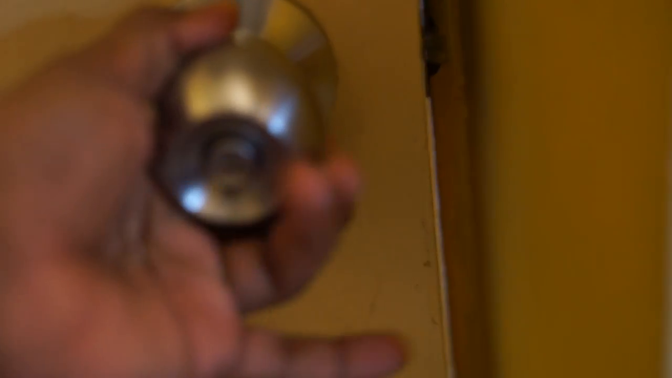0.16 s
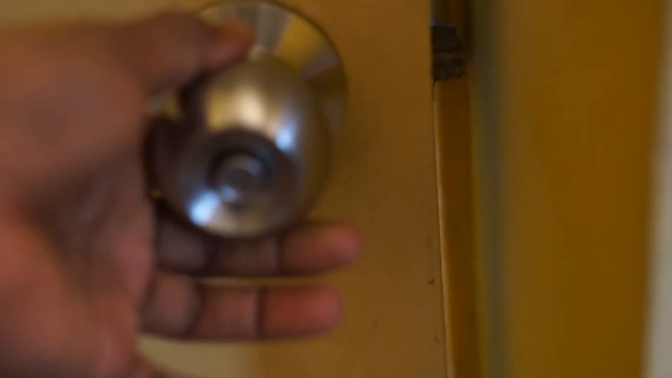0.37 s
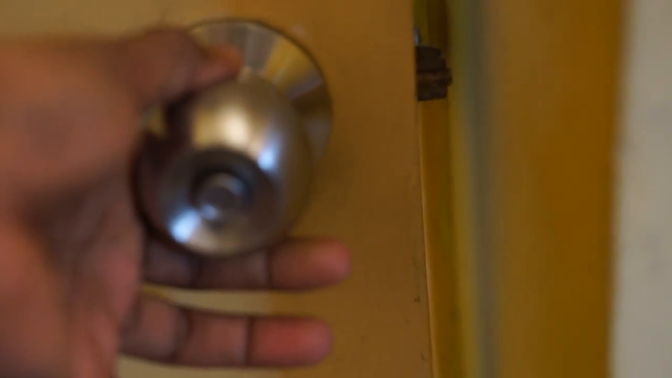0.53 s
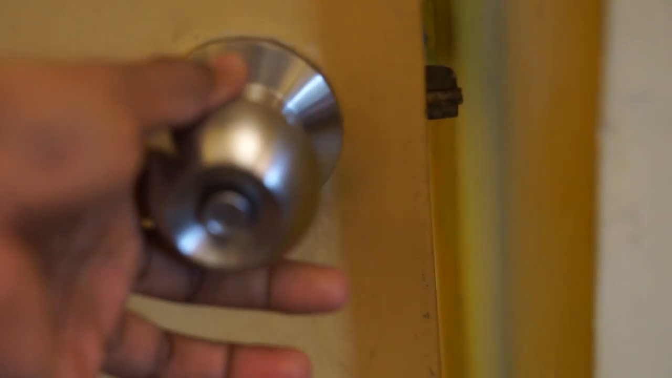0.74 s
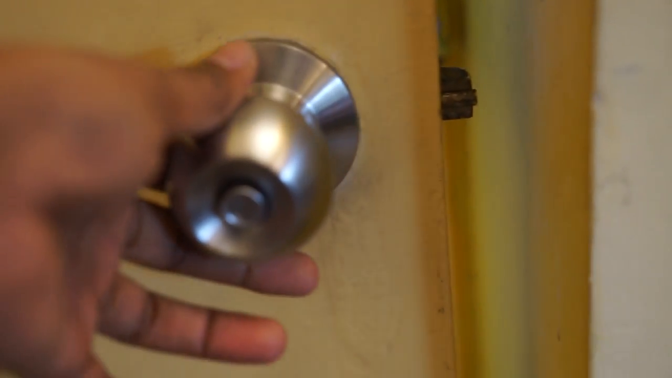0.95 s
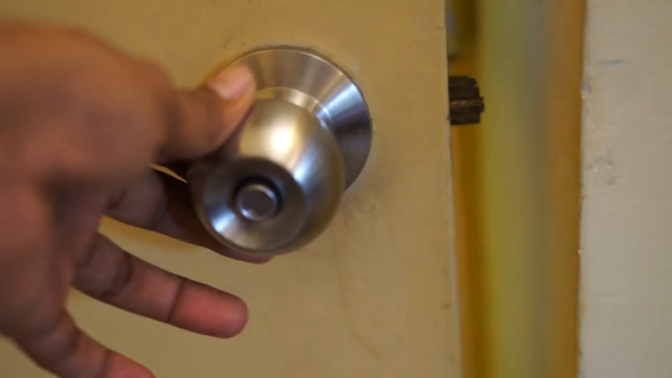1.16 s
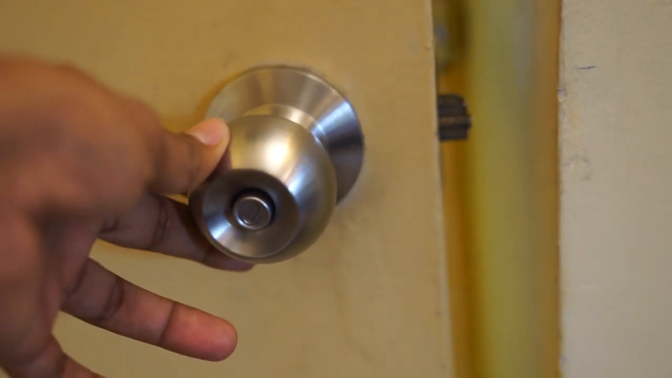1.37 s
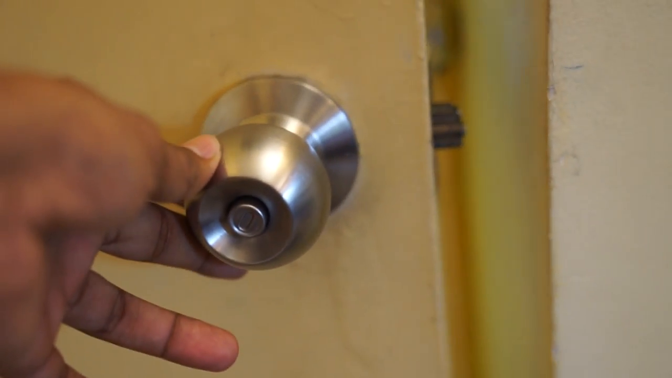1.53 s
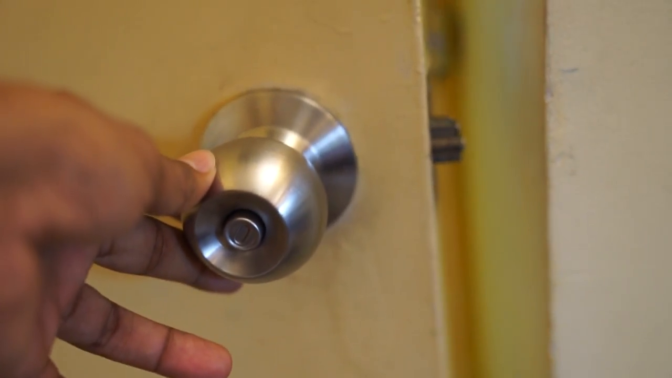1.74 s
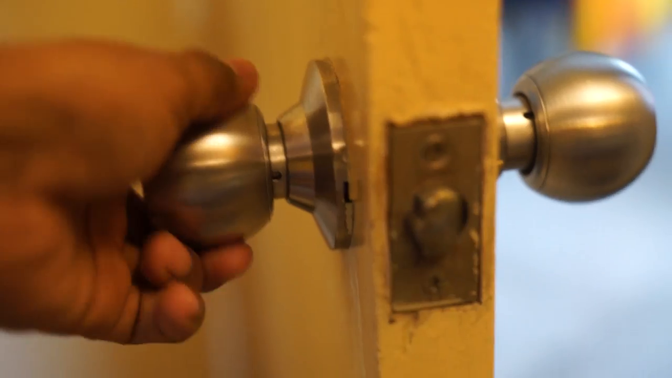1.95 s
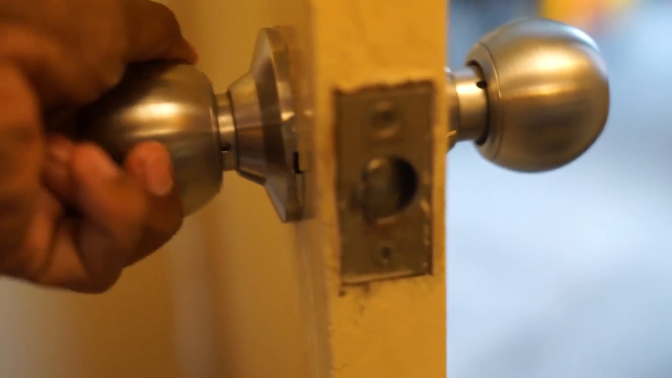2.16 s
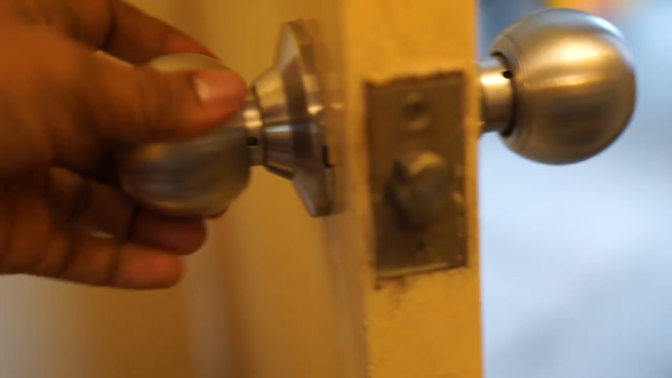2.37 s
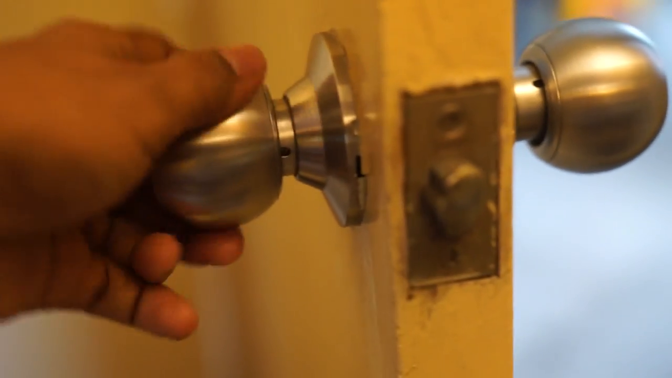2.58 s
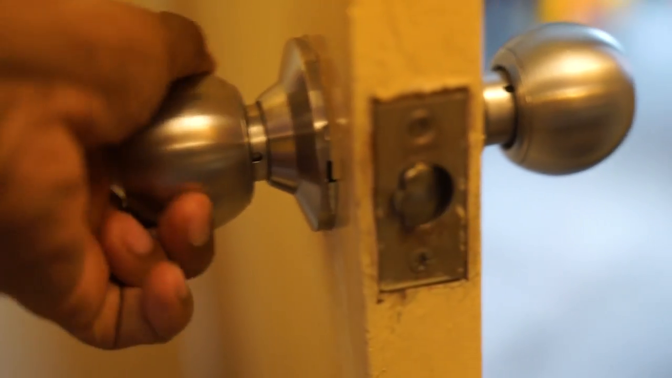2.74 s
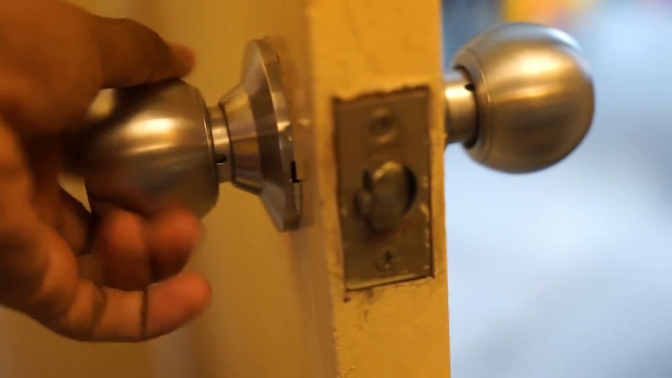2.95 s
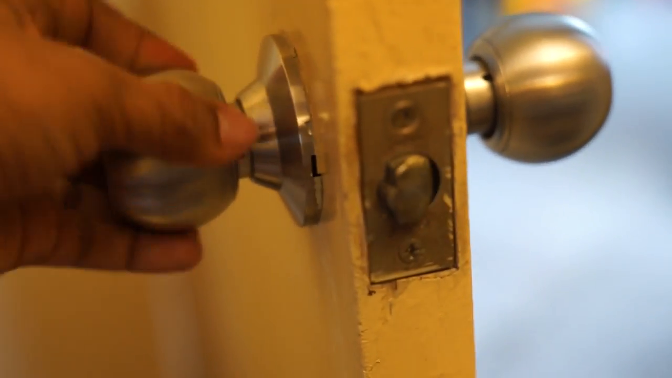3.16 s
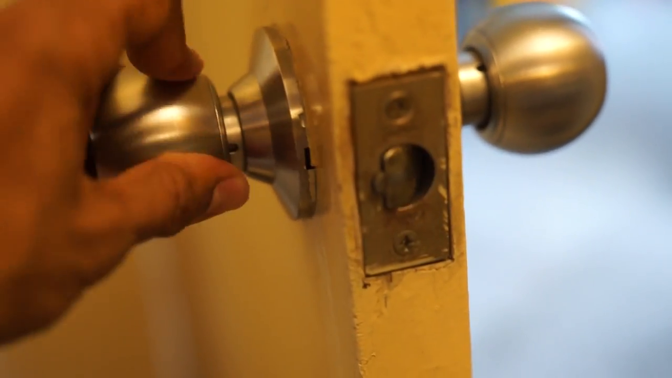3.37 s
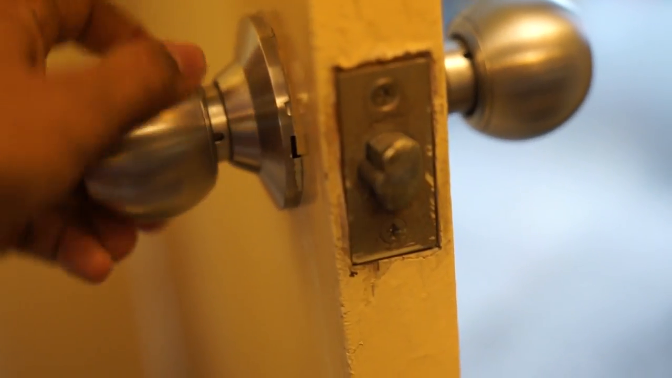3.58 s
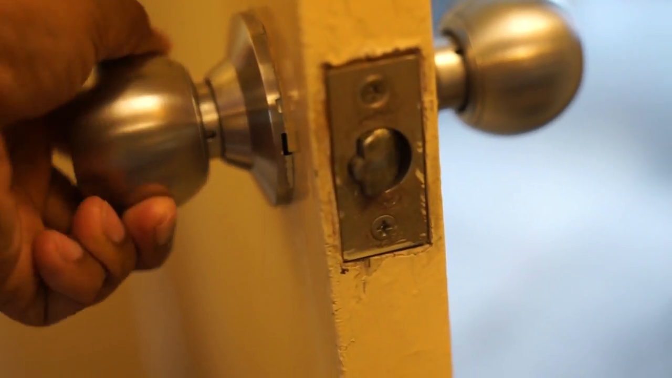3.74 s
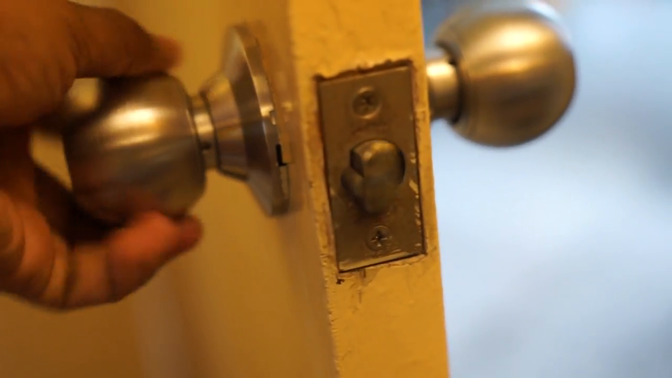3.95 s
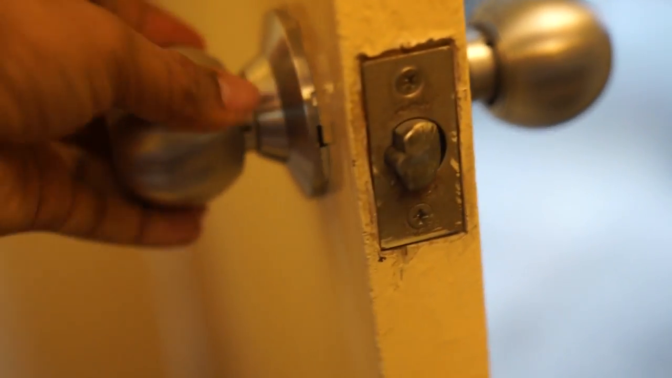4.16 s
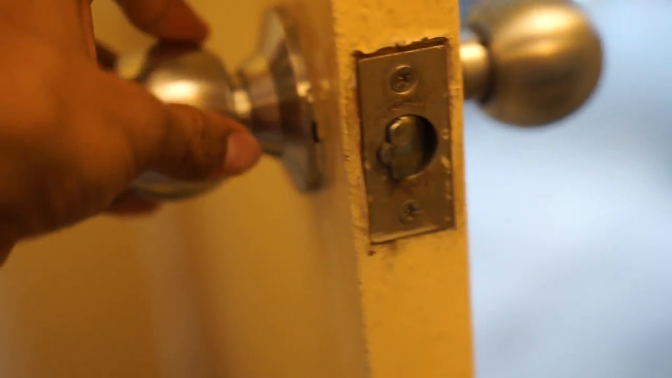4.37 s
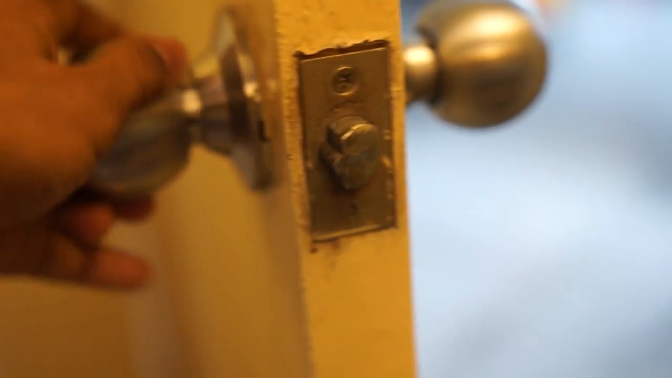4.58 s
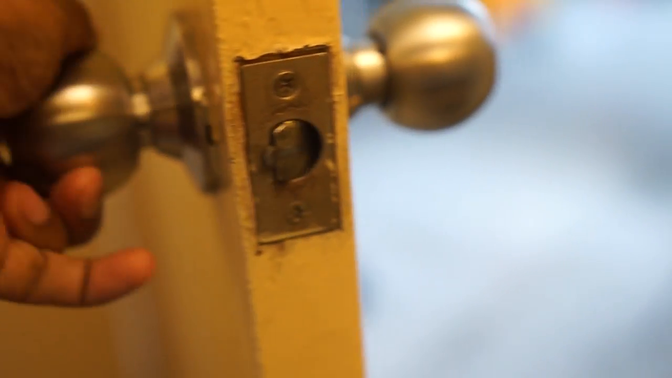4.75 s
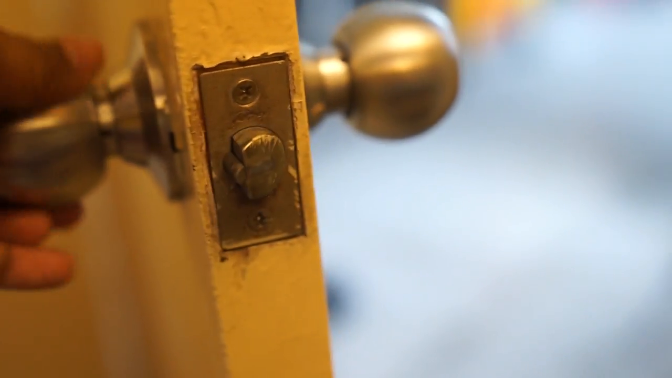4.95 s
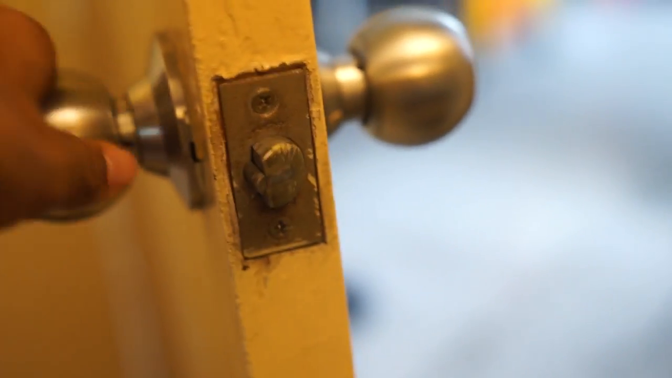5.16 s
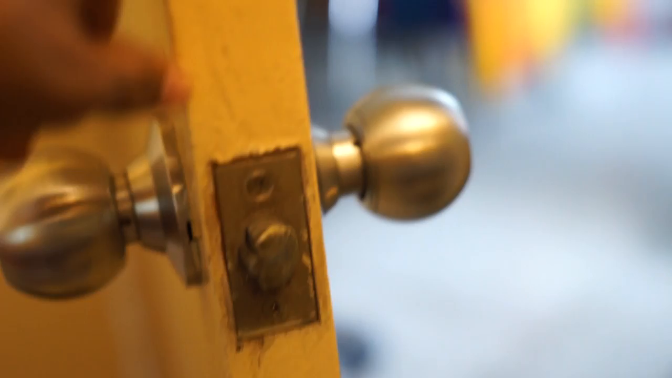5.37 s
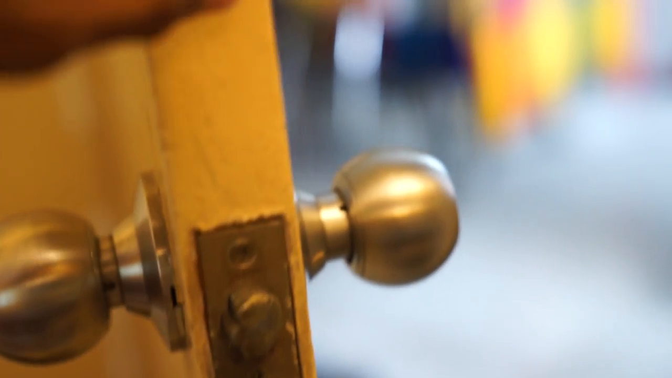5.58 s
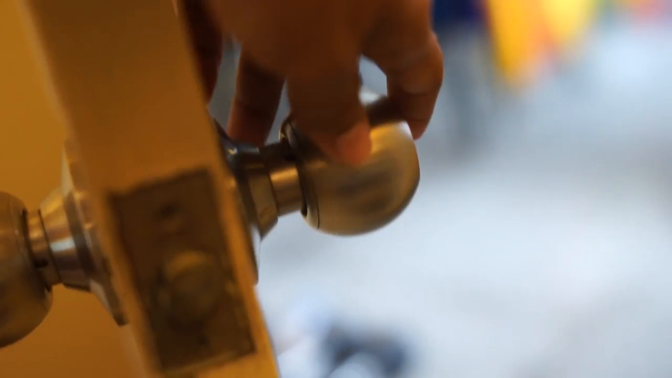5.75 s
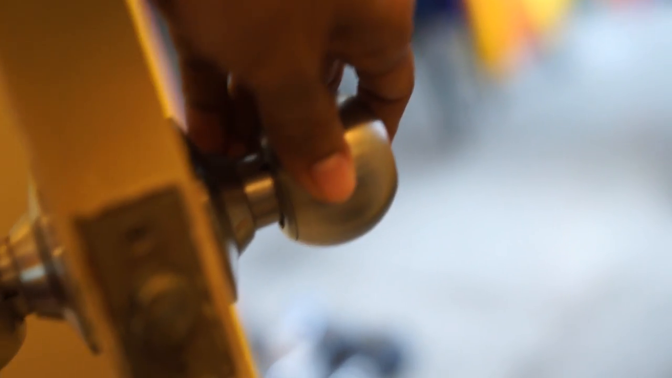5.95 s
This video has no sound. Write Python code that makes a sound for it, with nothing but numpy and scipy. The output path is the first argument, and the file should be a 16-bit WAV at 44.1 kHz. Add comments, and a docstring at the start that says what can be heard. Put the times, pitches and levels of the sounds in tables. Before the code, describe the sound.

A hand brushes the knob, and at about 0.2 seconds the bolt rattles loudly against the door frame, knocking again more softly at 0.5. Around 1 second the door swings open with a light ping and a faint falling whine. From 1.9 to 5.2 seconds the steel knob is twisted repeatedly: the spindle scrapes, the spring ticks and loose parts click. The latch snaps home sharply at about 2.3, 3.1 and 4.1 seconds, each time ringing the knob briefly and knocking the wooden door. Short, high squeaks of dry steel come at 3.6, 4.6 and 5 seconds. Near 5.6 seconds skin slides over the door with a soft hiss, followed by a gentle bump around 5.9. Everything is close, in a small hard-walled room with short reflections, over still air and a faint electrical hum.

```python
"""Close by in a small hard-walled room, a hand pulls a door off its latch: the bolt rattles on the frame,
then the door swings open with a light ping and a faint falling whine. The steel knob is twisted again
and again: the spindle scrapes, the spring ticks, and three times the latch snaps home, ringing the knob
and knocking the door. Three of the later turns squeak as dry steel sticks and slips. Last, skin slides
over the door and bumps it softly. Still air and a faint mains hum lie under it all."""
import sys
import numpy as np
from scipy import signal
from scipy.fft import rfft, irfft, next_fast_len
from scipy.io import wavfile
from scipy.ndimage import uniform_filter1d

SR = 44100
rng = np.random.default_rng(int(sys.argv[2]) if len(sys.argv) > 2 else 0)


def put_to_file(sound):
    """Save the sound as 16-bit audio at rate SR, in the file named by the first command-line argument."""
    columns = np.atleast_2d(sound).T  # one column per channel
    safe = np.clip(columns, -1, 1)
    whole_steps = np.round(safe * 32767)
    wavfile.write(sys.argv[1], SR, whole_steps.astype(np.int16))


N = 265173
TIME = np.arange(N) / SR
BAND_EDGES = np.geomspace(18, 16300, 33)
BAND_HZ = np.sqrt(BAND_EDGES[1:] * BAND_EDGES[:-1])

# tone colour of a clack in the lockset: f/Hz, level/dB
LOCK_COLOUR = [(70, -11), (245, -26.5), (320, -2), (400, 0.5), (700, 3), (1200, 3.5), (1800, 4.5),
               (2300, 3), (2900, -1), (4200, 2.5), (6100, 4), (8500, -4.5), (11700, -1.5), (15000, -30)]
# how fast a clack dies away: f/Hz, t60/s
CLACK_T60 = [(100, 0.02), (500, 0.12), (1500, 0.11), (4000, 0.063), (7000, 0.039), (13000, 0.02)]
# ring of the open door leaf (lowest two), the hollow knob and its rose: f/Hz, level/dB, t60/s
KNOB_MODES = [(167, -52.5, 0.95), (407, -34.5, 0.55), (1191.5, -28.5, 0.35), (1529, -20, 0.15),
              (2194, -33, 0.15), (2317, -14.5, 0.1), (2450, -17, 0.13), (2530, -28, 0.12),
              (3553, -21.5, 0.15), (3970, -45.5, 0.11), (4500, -33, 0.11), (6060, -14, 0.04),
              (6310, -19, 0.045), (10800, -20, .05), (11900, -41, .08)]
# the sprung latch snapping home: t/s, level/dB, catch level/dB, rebound delay/s, rebound level/dB
LATCH_SNAPS = [(2.349, -9.5, -19, 0.018, -26), (3.0612, -7.5, -33.5, .013, -17.5),
               (4.0511, -11, -18.5, .0127, -19.5)]
# loose parts clicking in the lockset: t/s, level/dB, extra treble/dB, extra door knock/dB
LOOSE_CLICKS = [(1.8737, -31, -12, -22), (1.9249, -31.5, -2, -10), (2.0104, -33, 5, -2),
                (2.0407, -29.5, 3, -2), (2.1088, -35.5, 1, 5), (2.254, -26.5, -10, -22),
                (2.5875, -20, -4, -9), (2.6286, -31, 10, 7.5), (2.6963, -28, -22, 4), (2.773, -39.5, 1, 10),
                (2.8695, -42, -7, 3), (2.9663, -32.5, -9, -12), (3.03, -29.5, 6, 0), (3.0507, -29, 5, -5),
                (3.318, -32, 7, -13), (3.4887, -43, -4, 4), (3.5475, -29.5, 7, 2), (3.5636, -24.5, 3, 3),
                (3.6337, -27.5, 14, 8), (3.683, -21.5, -0.5, -2.5), (3.7981, -32.5, -4, -5),
                (4.007, -37.5, 10, 16), (4.434, -39, 13.5, -32), (4.514, -36.5, -2, -12),
                (4.5542, -33, 8, 9.5), (4.5975, -28, 5, 1), (4.656, -28, 16.5, 11), (4.676, -19.5, 1.5, -6),
                (4.926, -36.5, 8, 6), (4.958, -34.5, 14, 0), (5.0352, -31, 15, 12.5), (5.164, -40, 5, 7.5)]
# the bolt knocking on the frame: t/s, level/dB, extra treble/dB, extra door knock/dB
BOLT_KNOCKS = [(.1696, -36, -10, 2), (.193, -36, -25, 4), (.2255, -18.5, -10, 0.5), (.2325, -15, -12, -16),
               (.2422, -6.5, -3, -5), (.2495, -8, 4.5, 3.5), (.2575, -13, 6, 7.5), (.5078, -19.5, -18, -2),
               (.529, -22, -14, -23), (.6295, -34, -7, 5), (.812, -49.5, -13, 11)]
# tone colour of a knock on the frame: f/Hz, level/dB
FRAME_COLOUR = [(70, -23.5), (130, -20), (245, -18), (310, -4.5), (550, -2), (800, 1.5), (1150, 5),
                (1500, 1.5), (1950, 5), (3200, -0.5), (4400, 0), (5800, 6), (8500, -0.5), (11700, 4.5),
                (15000, -26)]
# ring of the door leaf against its frame: f/Hz, level/dB, t60/s
FRAME_MODES = [(87.2, -43.5, 0.76), (161.6, -43, 0.86), (192.5, -39, 0.5), (305.4, -30.5, 0.25),
               (385.7, -27, 0.15), (500, -34.5, 0.11), (619, -41, .2), (883, -31.5, 0.15),
               (1020, -31, 0.12), (1225, -24.5, 0.081), (1385, -31, .12), (1992, -26.5, .12),
               (2410, -27, 0.072), (5710, -19, .09), (5730, -16.5, 0.13)]

# twists of the knob: start/s, stop/s, scrape level at the stop/dB, drag time/s
TWISTS = [(0.202, 0.281, -38, 0.042), (1.874, 1.885, -45.5, 0.17), (2.259, 2.347, -30, 0.26),
          (2.56, 2.627, -33.5, 0.1), (2.999, 3.063, -31, .265), (3.535, 3.571, -31, 0.14),
          (3.992, 4.059, -25.5, 0.25), (4.535, 4.679, -31.5, 0.22), (4.894, 5.016, -36.5, 0.062)]
DRAG_DB = -42   # the spindle dragging while the knob is held
# tone colour of the spindle's scrape: f/Hz, level/dB
SCRAPE_COLOUR = [(20, -34.5), (100, -7.5), (300, -4.5), (700, 0.5), (1500, 3.5), (2000, 3), (2350, 4),
                 (2900, -0.5), (4500, 0.5), (6300, -3), (8500, -15), (12000, -19), (15000, -34)]
# the return spring's ring on each tick: f/Hz, level/dB, t60/s
SPRING_MODES = [(2335, -14, .1), (6250, -10.5, .03), (11600, -16, .035)]
# dry steel sticking and slipping: t/s, time to break loose/s, f/Hz, level/dB
SQUEAKS = [(3.590, .021, 2245, -20), (4.598, 0.022, 2220, -19), (4.978, .0245, 2240, -19)]
# a squeak's harmonics, from the fundamental up: level/dB
SQUEAK_PARTIALS = [-0.5, -3.5, -21, -22, -12.5, -30]
# the swinging door's falling whine: t/s, f/Hz, level/dB
DOOR_WHINE = [(.94, 1970, -82), (.98, 1890, -55), (1.02, 1870, -53), (1.045, 1810, -82),
              (1.09, 1720, -55.5), (1.139, 1624, -85)]
# ring of lightly touched metal: f/Hz, level/dB, t60/s
PING_MODES = [(2500, -49, 0.038), (3090, -34, .03), (3250, -39, .03), (4900, -45, 0.25), (5500, -35, .04),
              (7460, -42, .02)]

# soft bumps of hand and door leaf: t/s, level/dB
BUMPS = [(0.17, -43), (.195, -37), (0.397, -39.5), (2.04, -41), (3.636, -37.5), (4.062, -29.5),
         (4.899, -36), (5.873, -43), (5.919, -48.5)]
# tone colour of a thud on wood: f/Hz, level/dB
THUD_COLOUR = [(80, -15), (240, -12.5), (320, -1.5), (450, -5.5), (750, -3), (1200, -12), (2500, -24),
               (8000, -48)]
# the hand sliding: t/s, length/s, fade/s, level/dB, treble tilt/dB
HAND_SLIDES = [(-.04, 0.08, 0.041, -37.5, 1), (0.87, 0.064, 0.091, -50, 13.5), (2.84, 0.11, .02, -56, 4.5),
               (5.198, .81, 0.02, -62, -14.5), (5.416, .2, .03, -61, -11.5),
               (5.615, 0.14, 0.0027, -39.5, -5.5)]
# tone colour of sliding skin: f/Hz, level/dB
SKIN_COLOUR = [(100, -4), (350, -7.5), (700, -3), (1100, -4), (2300, -1), (3500, -2), (6000, 0),
               (8000, -11), (11500, -15.5), (15000, -35)]

# tone colour of the early reflections: f/Hz, level/dB
EARLY_COLOUR = [(100, -5.5), (500, -2.5), (1200, -16.5), (3000, -11.5), (6000, -17), (8500, -13),
                (15000, -26)]
# tone colour of the reverb tail: f/Hz, level/dB
TAIL_COLOUR = [(100, -6.5), (500, -5.5), (2000, -7.5), (6000, -10.5), (8000, -15), (12000, -19.5),
               (16000, -34.5)]
# decay of the reverb tail: f/Hz, t60/s
TAIL_T60 = [(100, 0.76), (1000, 0.48), (3500, 0.63), (7000, 0.42), (14000, 0.38)]
# tone colour of still air: f/Hz, level/dB
AIR_COLOUR = [(8, -26), (24, -2), (45, -15.5), (80, -7), (135, -11), (300, -11), (450, -11.5), (1000, -18),
              (2500, -27.5), (6000, -31), (9000, -35.5), (16000, -38.5)]
# partials of the mains hum: f/Hz, level/dB
HUM_PARTIALS = [(99.5, -60), (301, -64), (400, -66.5)]
# the hum's fader ride: t/s, gain/dB
HUM_RIDE = [(0, -4), (1.85, -1.5), (1.9, -4.5), (6, -4)]


def latch():
    """The latch snaps home, squeaks break loose and loose parts click; every hit rings the knob."""
    hits = []   # t/s, level/dB, extra treble/dB, extra door knock/dB
    for s, db, catch_db, rebound_s, rebound_db in LATCH_SNAPS:
        hits.append((s - 0.017, catch_db, 3, -10))   # the catch lets go with a thin click
        hits.append((s, db, 3, -11))   # the latch hits its stop
        hits.append((s + rebound_s, rebound_db, 13, 3))   # a sharp rebound knocks the door
    hits += [(s + stuck_s, -20, 3.5, -9) for s, stuck_s, _, _ in SQUEAKS]
    return clacks(hits + LOOSE_CLICKS, LOCK_COLOUR, KNOB_MODES,
                  treble_hz=7570, door_hz=1390, vary_db=2.5, seat_s=0.00028, t60_scale=1.0)


def bolt():
    """The bolt rattles on the frame as the door is pulled free."""
    return clacks(BOLT_KNOCKS, FRAME_COLOUR, FRAME_MODES,
                  treble_hz=7230, door_hz=1420, vary_db=2.0, seat_s=0.00038, t60_scale=0.82)


def clacks(hits, colour, modes, treble_hz, door_hz, vary_db, seat_s, t60_scale):
    """Each hit builds as loose parts seat, then leaves a dense short ring and a few longer modes."""
    t = TIME[:SR // 8]
    bands = noise_bands(SR // 2)
    envelopes = dying(t60_scale * at_hz(CLACK_T60), t) * (1 - np.exp(-t / seat_s))
    treble_shelf = 1 / (1 + (treble_hz / BAND_HZ) ** 6)   # a sharp edge adds bite
    door_shelf = 1 / (1 + (BAND_HZ / door_hz) ** 2)   # a knock into the wood adds body
    rings = struck(modes, count=len(hits), vary_db=4.0)
    out = np.zeros(N)
    for (s, db, treble_db, door_db), ring in zip(hits, rings):
        band_db = at_hz(colour) + treble_db * treble_shelf + door_db * door_shelf
        band_db += vary_db * rng.standard_normal(len(BAND_HZ))
        start = rng.integers(bands.shape[1] - len(t))
        add(out, s, from_db(db + band_db) @ (bands[:, start:start + len(t)] * envelopes))
        add(out, s, from_db(db) * ring)
    return out


def struck(modes, count, vary_db):
    """One ring per hit; the modes' strengths and signs depend on where it lands."""
    hz, db, t60 = np.transpose(modes)
    t = TIME[:SR // 3]
    chance = rng.standard_normal((count, 2, len(hz)))
    gains = from_db(db + vary_db * chance[:, 0]) * np.sign(chance[:, 1])
    return gains @ (np.sin(2 * np.pi * hz[:, None] * t) * dying(t60, t))


def spindle(jerks_per_s, spread_db, slip_s, wander_db):
    """The turning spindle slips in tiny jerks, each a short rasp; its brightness wanders slowly."""
    sizes = from_db(spread_db * np.minimum(rng.exponential(1, N), 4))
    jerks = sizes * (rng.random(N) < jerks_per_s / SR)
    power = signal.lfilter([1], [1, -np.exp(-1 / (slip_s * SR))], jerks ** 2 + 1e-18)
    graze = rms_one(uniform_filter1d(rng.standard_normal(N), size=1200))
    rasp = tilted(coloured(SCRAPE_COLOUR), wander_db * graze, pivot_hz=2470)
    return from_db(scrape_db(TIME)) * rms_one(np.sqrt(power)) * rms_one(rasp)


def scrape_db(t):
    """The scrape follows the spring's wind-up to the stop, sinks to a steady drag and dies away."""
    attack, fall, release = 904, 171, 106   # dB/s
    twists = []
    for start, stop, db, drag_s in TWISTS:
        winding = np.interp(t, [start, stop], [-44, db]) - attack * np.maximum(start - t, 0)
        held = np.maximum(db - fall * (t - stop), min(db, DRAG_DB))
        held -= release * np.maximum(t - stop - drag_s, 0)
        twists.append(np.where(t < stop, winding, held))
    return np.max(twists, axis=0)


def spring(ticks_per_twist):
    """The return spring ticks at random in each twist, louder where the spindle scrapes harder."""
    times = np.concatenate([rng.uniform(start, stop + drag_s, ticks_per_twist)
                            for start, stop, _, drag_s in TWISTS])
    softness, dullness, thinness = rng.standard_normal((len(times), 3)).T
    db = -38 + 0.473 * (scrape_db(times) - DRAG_DB) - 2 * softness
    ticks = list(zip(times, db, -4.5 * dullness, -8 - 4.5 * thinness))
    return clacks(ticks, LOCK_COLOUR, SPRING_MODES,
                  treble_hz=7400, door_hz=1320, vary_db=2.0, seat_s=0.00026, t60_scale=0.94)


def squeaks():
    """Dry steel starts sharp, swells as its pitch settles and sags, breaks loose and lingers softly."""
    attack_s, break_s, linger_s, release_s, linger_db = 0.015, 0.0071, 0.049, 0.0097, -11
    sharp_hz, settle_s, sag_hz_per_s = 188, 0.00576, 215
    out, t = np.zeros(N), TIME[:SR // 8]
    for s, stuck_s, hz, db in SQUEAKS:
        pitch = hz + sharp_hz * np.exp(-t / settle_s) - sag_hz_per_s * t
        loose = np.clip((t - stuck_s) / break_s, 0, 1)
        fade = np.clip(np.minimum(t / attack_s, 1 - (t - stuck_s - linger_s) / release_s), 0, 1)
        add(out, s, fade * stick_slip(pitch, db + linger_db * loose))
    return out


def stick_slip(hz, db, jitter=0.0047, waver_db=1.6, full_tone_db=-16.0, darkening=0.97):
    """A slightly unsteady friction tone; the softer it is, the fewer overtones it keeps."""
    wobble, waver = rms_one(uniform_filter1d(rng.standard_normal((2, SR)), size=90))[:, :len(hz)]
    phase = 2 * np.pi * np.cumsum(hz * (1 + jitter * wobble)) / SR
    db_per_octave = darkening * np.minimum(db - full_tone_db, 0)
    tone = sum(from_db(partial_db + db_per_octave * np.log2(k)) * np.sin(k * phase)
               for k, partial_db in enumerate(SQUEAK_PARTIALS, 1))
    return np.sqrt(2) * from_db(db + waver_db * waver) * tone


def knob_rim(squeal, hz, t60, gain_db):
    """The knob's thin rim rings on when a squeak's overtone comes close to its pitch."""
    t = TIME[:SR // 2]
    ring = np.sin(2 * np.pi * hz * t) * dying(np.array([t60]), t)[0]
    return from_db(gain_db) * signal.fftconvolve(squeal, ring)[:N]


def door_whine():
    """Friction sings a faint falling note as the door swings open."""
    out, t = np.zeros(N), np.arange(DOOR_WHINE[0][0], DOOR_WHINE[-1][0], 1 / SR)
    add(out, t[0], stick_slip(*in_time(DOOR_WHINE, t)))
    return out


def ping(at_s):
    """One light touch of metal rings briefly."""
    out = np.zeros(N)
    add(out, at_s, struck(PING_MODES, count=1, vary_db=1.0)[0])
    return out


def bumps(attack_s, decay_s):
    """A soft push on the wood gives a dull thud with a blunt attack."""
    envelope, t = np.zeros(N), TIME[:SR // 5]
    shape = np.minimum(t / attack_s, np.exp(-(t - attack_s) / decay_s))
    for s, db in BUMPS:
        add(envelope, s, from_db(db) * shape)
    return envelope * rms_one(coloured(THUD_COLOUR))


def hand(attack_s):
    """Skin sliding on a smooth surface hisses, brighter on steel than on paint."""
    hiss, out = coloured(SKIN_COLOUR), 0
    for s, length_s, fade_s, db, tilt_db in HAND_SLIDES:
        attack = np.clip((TIME - s) / attack_s, 0, 1)
        release = np.exp(-np.maximum(TIME - s - length_s, 0) / fade_s)
        out += from_db(db) * attack * release * tilted(hiss, tilt_db, pivot_hz=2980)
    return out


def room(send, early_t60, onset_s):
    """Near walls slap back at once; a diffuse tail follows and hangs longest in the bass."""
    t, response = TIME[:SR], 0
    for colour, t60 in ((EARLY_COLOUR, np.full(len(BAND_HZ), early_t60)), (TAIL_COLOUR, at_hz(TAIL_T60))):
        shape = dying(t60, t) * (1 - np.exp(-(t / onset_s) ** 2))
        shape /= np.linalg.norm(shape, axis=1, keepdims=True)
        response += from_db(at_hz(colour)) @ (noise_bands(len(t)) * shape)
    return signal.fftconvolve(send, response)[:N]


def room_tone(air_db):
    """A bed of still air and faint mains hum."""
    hum = sum(from_db(db) * np.sqrt(2) * np.sin(2 * np.pi * (hz * TIME + rng.random()))
              for hz, db in HUM_PARTIALS)
    return from_db(air_db) * rms_one(coloured(AIR_COLOUR)) + hum * from_db(in_time(HUM_RIDE)[0])


def noise_bands(size):
    """White noise in roughly third-octave bands; neighbours are unrelated."""
    white = rng.standard_normal((2, size + SR // 4))
    bands = [signal.sosfilt(signal.butter(2, edges, "band", fs=SR, output="sos"), white[k % 2])
             for k, edges in enumerate(zip(BAND_EDGES, BAND_EDGES[1:]))]
    return np.array(bands)[:, -size:]


def coloured(colour):
    """White noise through an EQ curve."""
    size = next_fast_len(N, real=True)
    hz = np.maximum(np.arange(size // 2 + 1) * SR / size, 1)
    return irfft(rfft(rng.standard_normal(size)) * from_db(at_hz(colour, hz)), size)[:N]


def tilted(x, tilt_db, pivot_hz):
    """Tilt EQ: treble up and bass down by the same amount."""
    bass = signal.sosfilt(signal.butter(1, pivot_hz, fs=SR, output="sos"), x)
    return bass * from_db(-tilt_db) + (x - bass) * from_db(tilt_db)


def from_db(db):
    """Decibels to gain."""
    return 10 ** (np.asarray(db) / 20)


def rms_one(x):
    """Scale to unit power."""
    return x / np.sqrt(np.mean(x ** 2) + 1e-20)


def in_time(rows, t=TIME):
    """One automation curve per column, in straight ramps."""
    times, *columns = np.transpose(rows)
    return [np.interp(t, times, column) for column in columns]


def at_hz(points, hz=BAND_HZ):
    """Read a curve on a log-frequency axis."""
    f, value = np.transpose(points)
    return np.interp(np.log(hz), np.log(f), value)


def dying(t60, t):
    """One exponential decay for each t60."""
    return np.exp(-np.log(1000) * t / np.maximum(t60, 1e-3)[:, None])


def add(track, s, sound):
    """Mix a sound in at s seconds."""
    start = max(round(s * SR), 0)
    track[start:start + len(sound)] += sound[:max(N - start, 0)]


def scene():
    """Clatter and squeaks feed the room; the rim, the hand's rustle and the room tone stay dry."""
    bed = hand(attack_s=0.039) + room_tone(air_db=-55)
    squeal = squeaks() + door_whine()
    scrape = spindle(jerks_per_s=550, spread_db=3.0, slip_s=0.0026, wander_db=2.0)
    clatter = bolt() + latch() + spring(ticks_per_twist=7) + scrape
    clatter += ping(at_s=0.9095) + bumps(attack_s=0.0065, decay_s=0.022)
    reverb = room(clatter + from_db(-2.5) * squeal, early_t60=0.15, onset_s=0.0036)
    rim = knob_rim(squeal, hz=4485, t60=0.55, gain_db=-60)
    return (clatter + squeal + rim + reverb + bed)[None]


def record(dry):
    """Soft clipping rounds the peaks; a steep low-pass trims the very top."""
    return signal.sosfilt(signal.ellip(10, .1, 80, 15750, fs=SR, output="sos"), np.tanh(dry))


dry = scene()
out = record(dry)
put_to_file(out)
```